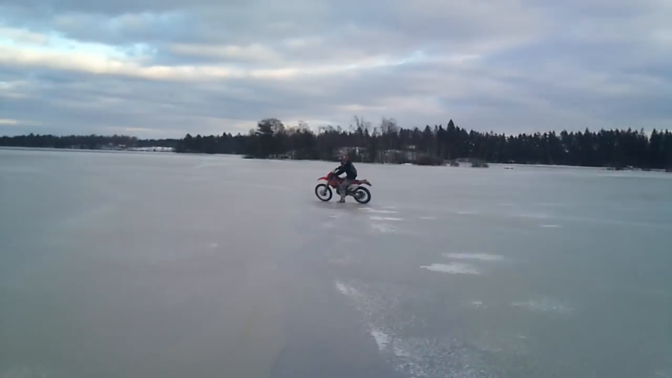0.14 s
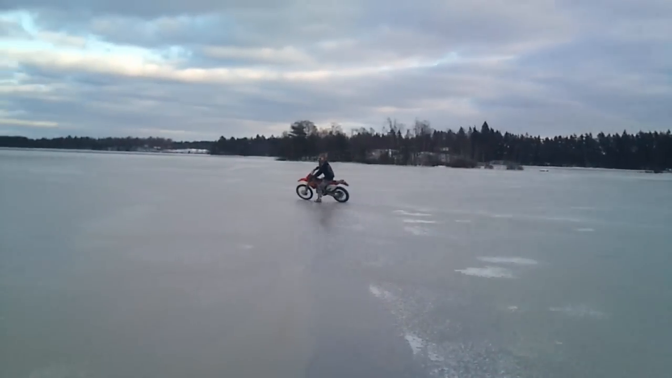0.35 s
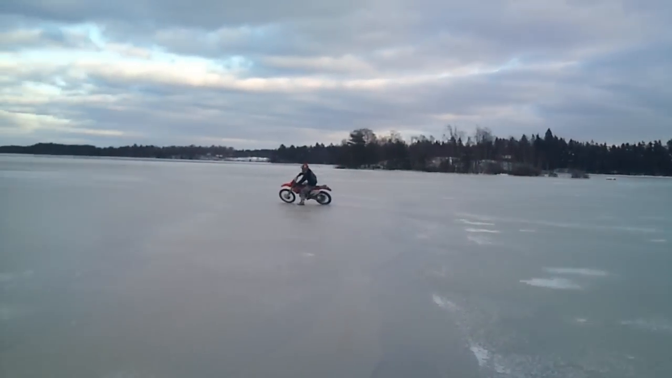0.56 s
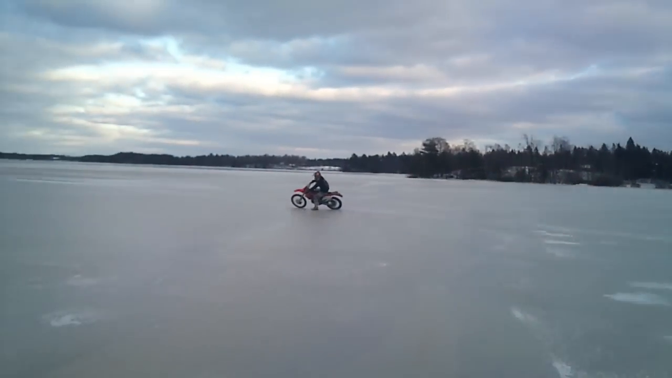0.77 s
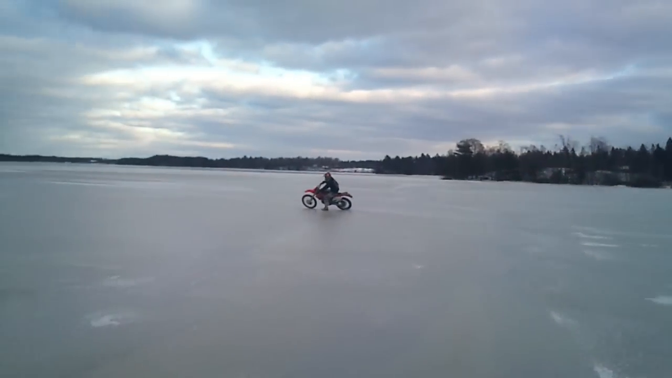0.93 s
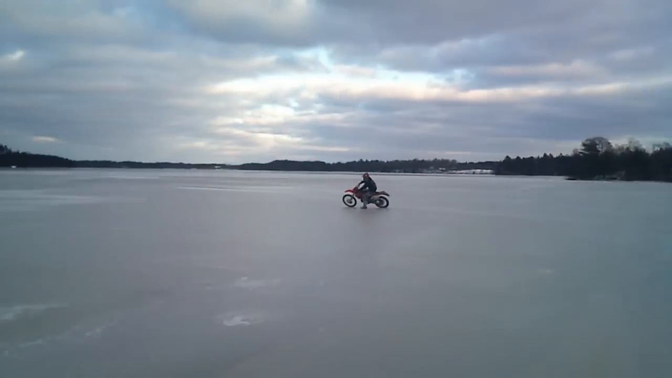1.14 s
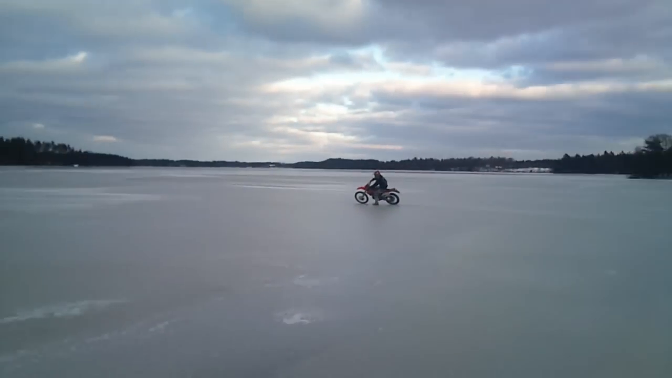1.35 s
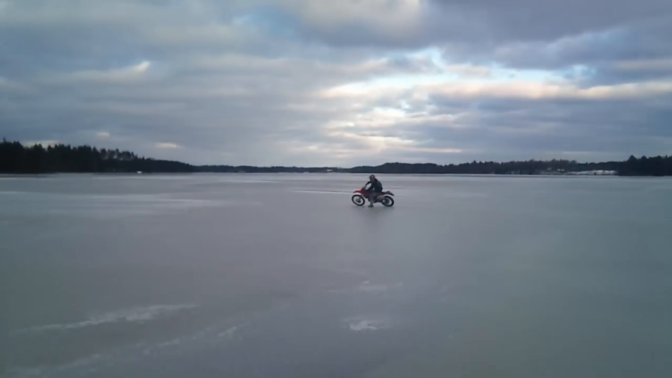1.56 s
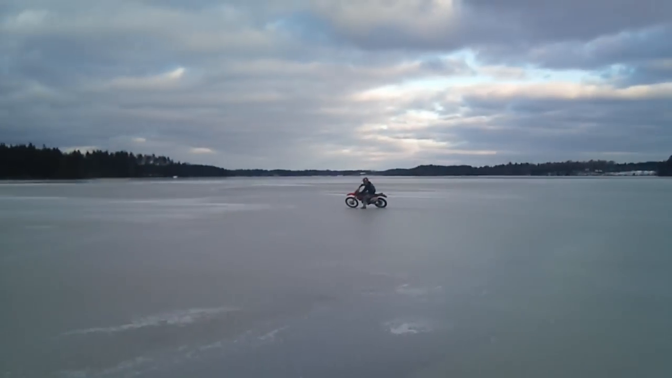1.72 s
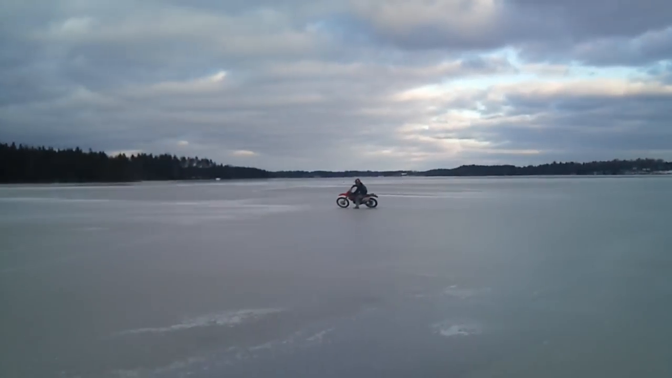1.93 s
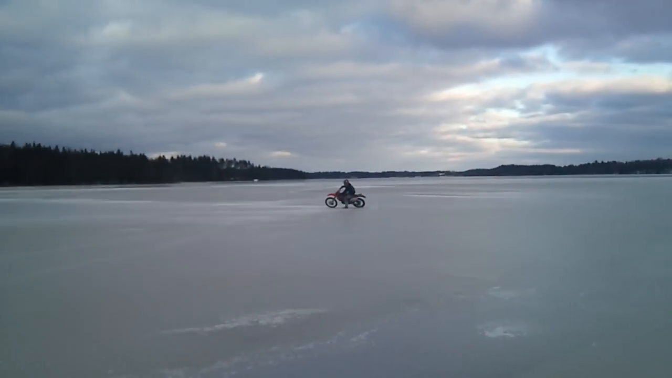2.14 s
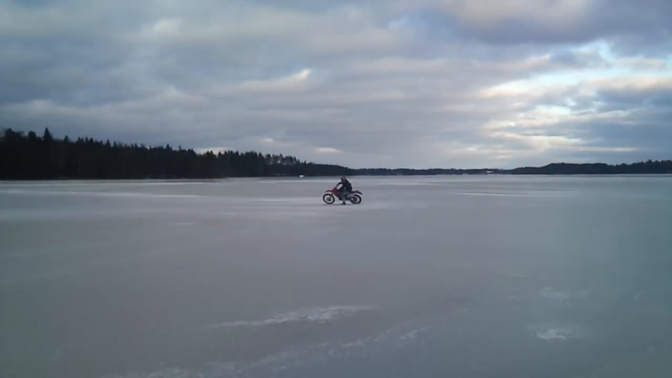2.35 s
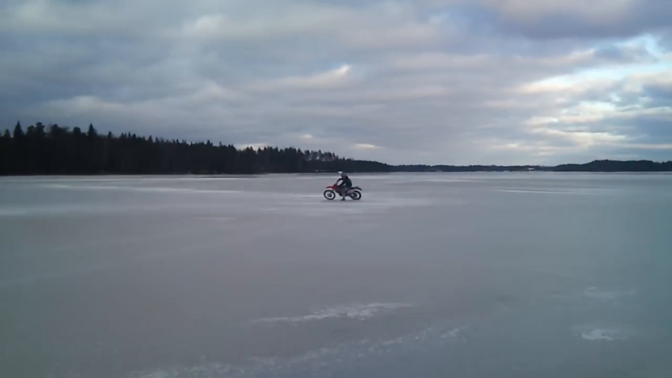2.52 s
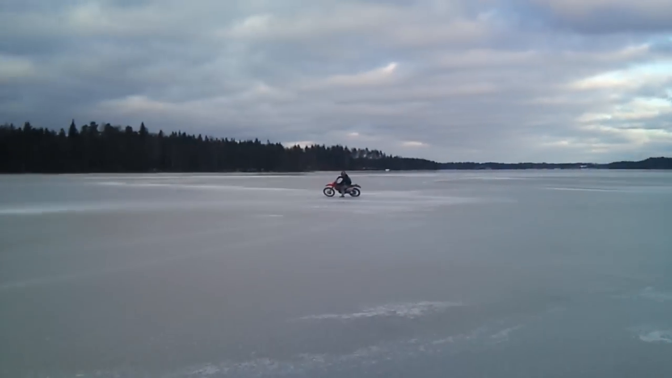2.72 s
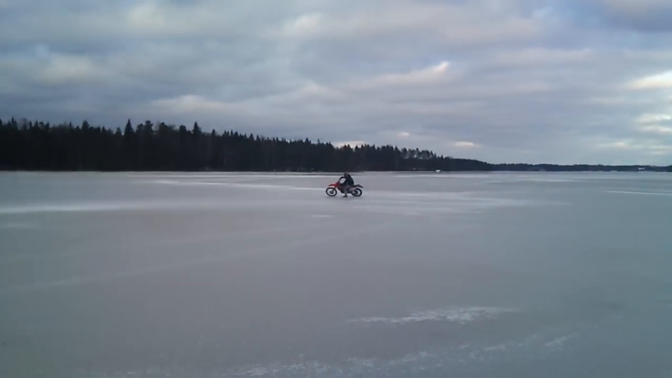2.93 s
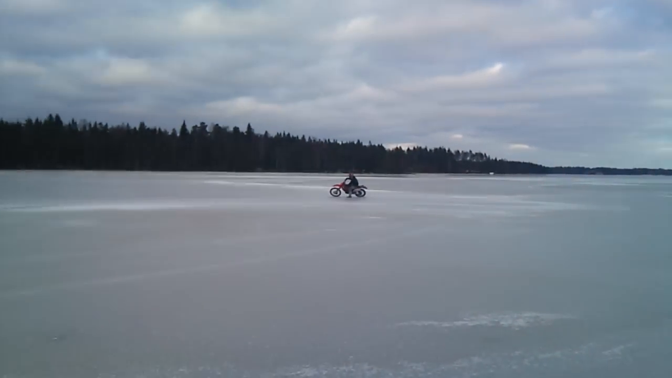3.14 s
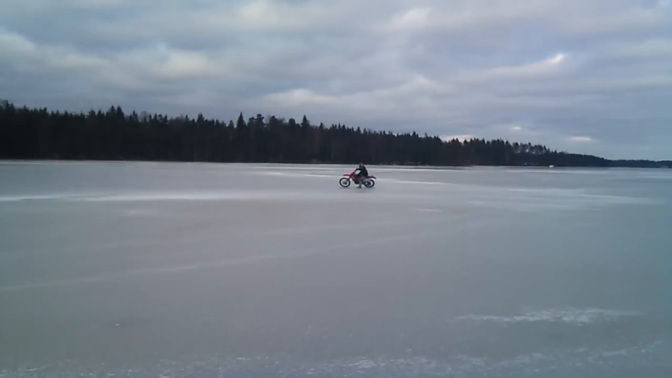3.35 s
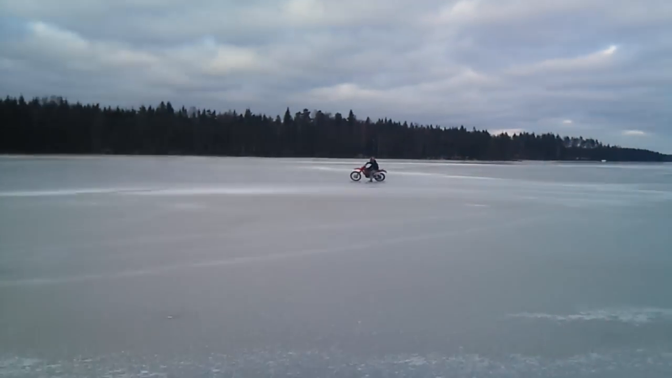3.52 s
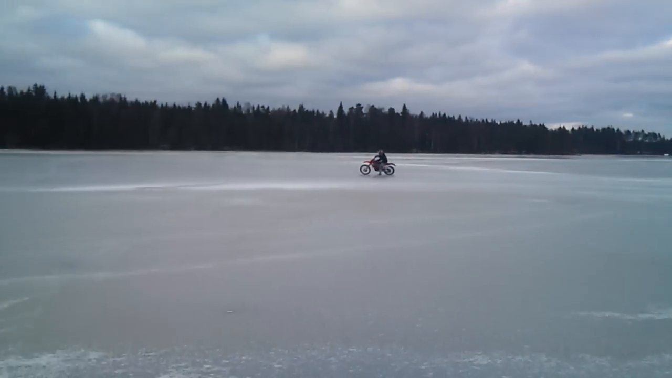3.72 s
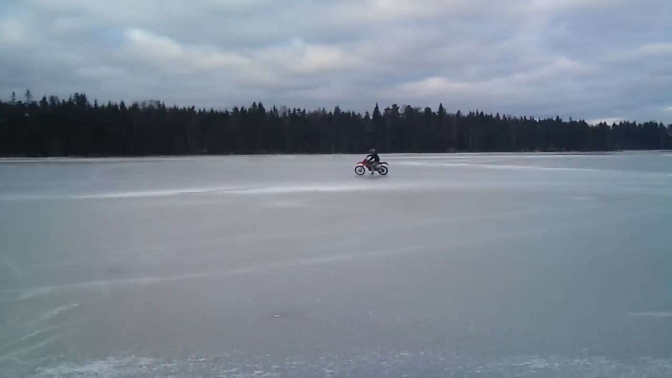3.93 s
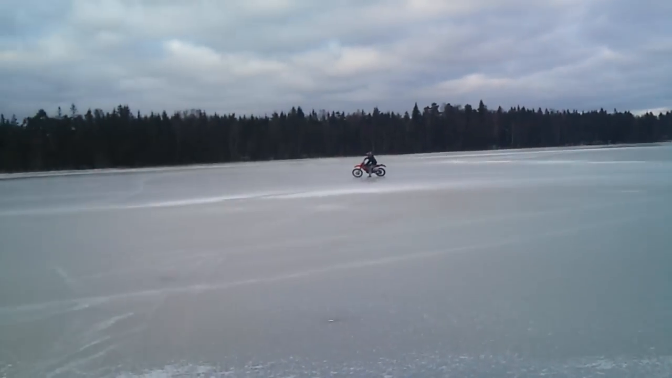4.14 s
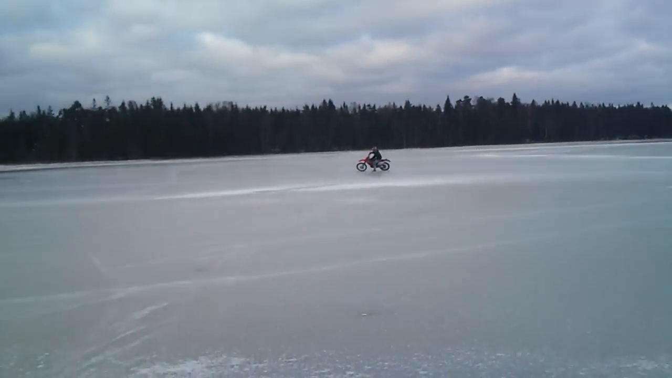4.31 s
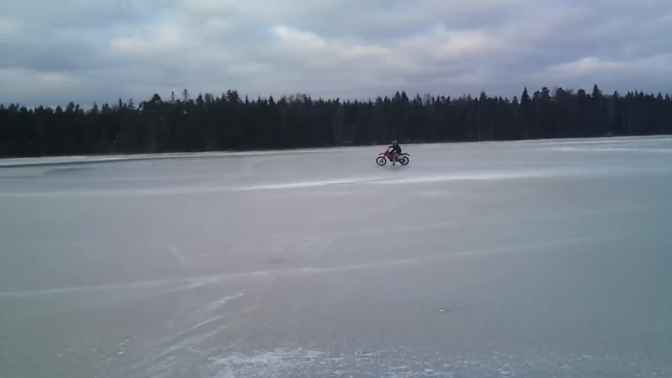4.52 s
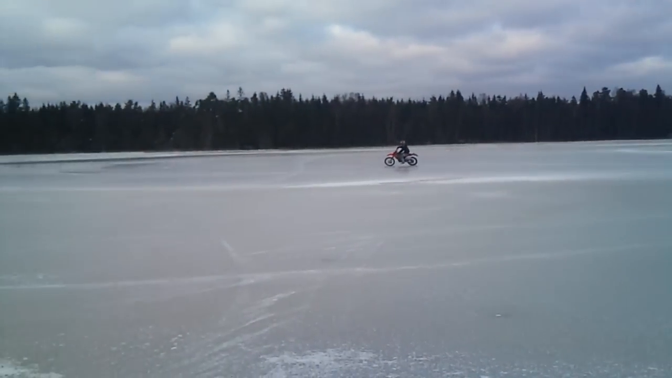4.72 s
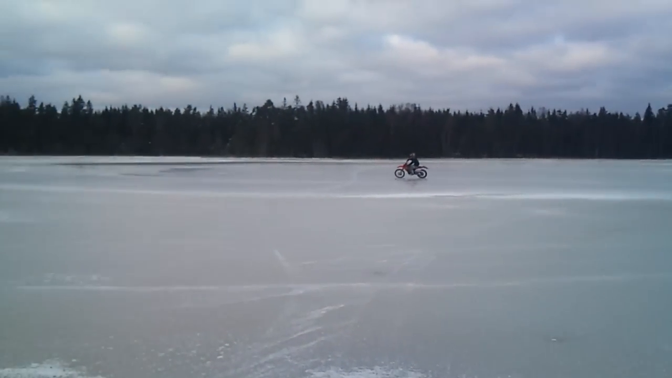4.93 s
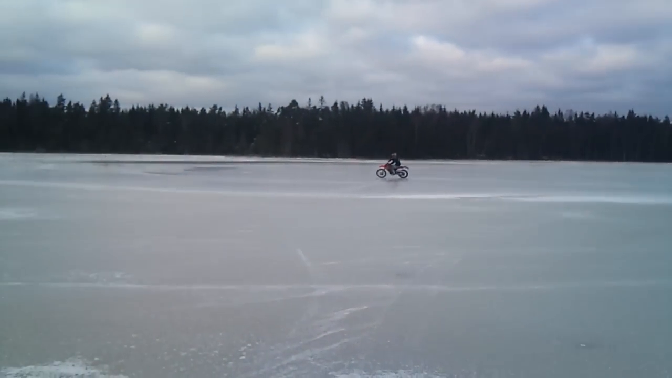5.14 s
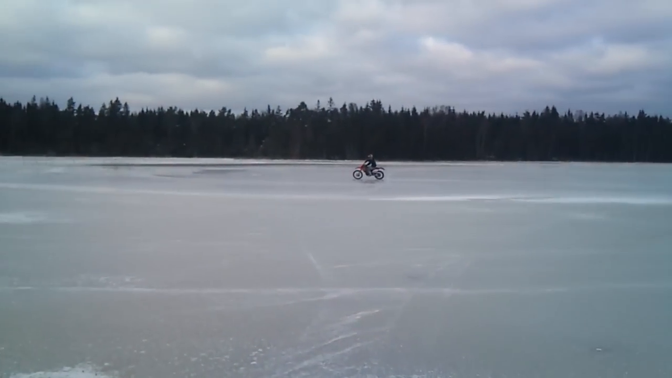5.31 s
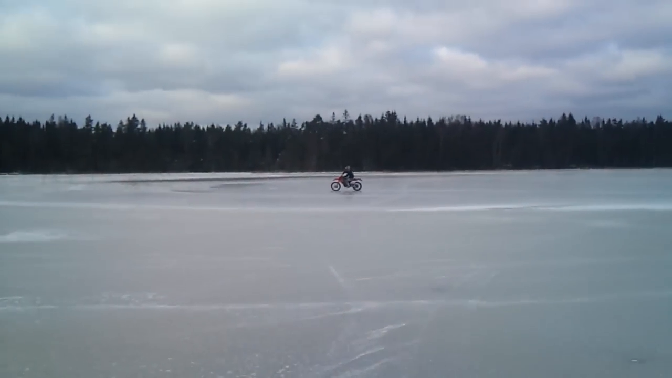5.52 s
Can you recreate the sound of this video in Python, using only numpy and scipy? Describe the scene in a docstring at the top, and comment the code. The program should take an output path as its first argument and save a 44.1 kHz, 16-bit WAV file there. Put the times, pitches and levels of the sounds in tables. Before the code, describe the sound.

Raspy four-stroke motorcycle exhaust, rapid even banging at nearly constant revs, grows duller and quieter with distance before the throttle finally closes.

```python
"""A frozen lake: a single-cylinder four-stroke dirt bike, already some way off, draws further away.
Each firing sends a pressure bang down the exhaust pipe, where it reflects; the silencer rings and booms,
the steep wave front cracks, the outlet sputters and the gas rushes. Near the end the throttle shuts:
low gulps and soft puffs replace the bangs. Faint scattered sound and a light wind lie behind."""
import sys
import numpy as np
from scipy import signal
from scipy.io import wavfile
from scipy.ndimage import uniform_filter1d

SR = 44100
rng = np.random.default_rng(int(sys.argv[2]) if len(sys.argv) > 2 else 0)


def generate_wav(signal):
    """Clip the signal to [-1, 1] and save it as 16-bit WAV at the path in sys.argv[1]."""
    frames = np.transpose(np.atleast_2d(signal))
    scaled = np.clip(frames, -1, 1) * 32767
    pcm = np.round(scaled).astype(np.int16)
    wavfile.write(sys.argv[1], SR, pcm)


N = 245637
TIME = np.arange(N) / SR

# engine speed under power: time_s, firing_rate_hz
FIRING_RATE = [(0.0, 42.55), (0.33, 43.17), (0.69, 46.84), (0.9, 46.44), (0.94, 45.43), (1.28, 45.5),
               (1.5, 44.95), (1.7, 45.45), (1.96, 47.43), (2.36, 46.6), (2.86, 47.21), (3.24, 48.59),
               (3.6, 46.69), (3.66, 47.09), (3.91, 43.44), (4.22, 47.77), (4.68, 46.74), (4.93, 48.19)]
# the rider's hand: time_s, opening (0 shut, 1 wide open)
THROTTLE_OPENING = [(0, 0.92), (.8, 0.8), (.94, 0.66), (1.9, 0.78), (3.05, 0.69), (3.4, 0.3), (3.85, .3),
                    (4.08, 1), (4.22, .7), (4.6, 0.69), (4.9, .7)]
# the bike's path: time_s, distance_m
BIKE_DISTANCE = [(0, 26.1), (3.6, 47.8), (5.57, 63.6)]
# reflections in header and silencer, before temperature and throttle act: delay_ms, pressure_share
PIPE_ECHOES = [(2.05, 0.33), (3.47, 0.44), (5.3, 0.69), (7.5, 0.23), (10.64, 0.2), (13.57, -0.073),
               (15.9, 0.14), (18.3, 0.064)]
# hot gas carries sound faster, so echoes come sooner as the pipe warms: time_s, delay_factor
PIPE_WARMING = [(0, 1.036), (1.4, .995), (4.9, 0.988)]
# standing waves of the silencer can: frequency_hz, width_hz, level_db (relative to the passing wave)
CAN_MODES = [(234.2, 18, -3.5), (387.5, 39, -1), (553.6, 56, -14), (807, 200, -5.5)]
# silencer's honk near 770 Hz: time_s, level_db (over its usual level)
HONK_LEVEL = [(0, 2), (.9, -2.5), (2, -3), (3.85, -2.5), (4.08, 6.5), (4.65, 0.5), (4.85, 5.5)]
# silencer's upper ring, before a fixed trim: time_s, level_db
UPPER_RING_LEVEL = [(0.06, -31), (0.81, -26.5), (0.96, -33), (2.06, -29.5), (2.33, -37), (3.38, -35.5),
                    (3.42, -41.5), (3.94, -31), (4.14, -37.5), (4.29, -32.5), (4.41, -40.5), (4.88, -37)]
# gas flow through one cycle, before the surge factor: cycle_share since the firing, level_db
GAS_FLOW = [(0, -12), (.05, 4.5), (.22, 0.5), (.38, 4.5), (.6, 0.5), (1, -1.5)]
# hiss of the gas, before its random waver: time_s, level_db
HISS_LEVEL = [(0, -25.5), (.43, -29.5), (1.7, -34), (2.2, -36), (2.8, -36.8), (2.93, -42), (3.12, -37),
              (5.05, -39), (5.57, -42)]
# filter shapes, relative levels: frequency_hz, level_db
BANG_SPECTRUM = [(30, -43), (55, -9.5), (95, -17.5), (135, -5), (185, 3), (290, -2), (400, -3), (570, 1.5),
                 (680, -1.5), (800, -11), (1100, -37), (1500, -36.5), (1900, -42), (4000, -56)]
CRACK_SPECTRUM = [(1200, -25.5), (1850, -29), (2030, -3), (2200, -8), (2400, 0), (2560, -3), (2930, 4),
                  (3400, -0.5), (4000, -4.5), (5000, -23), (7500, -35)]
PUFF_SPECTRUM = [(100, -19), (250, -22.5), (350, 14), (480, 5), (600, 8), (800, -0.5), (1100, -8.5),
                 (1450, -55), (1900, -52), (4000, -50)]
GAS_SPECTRUM = [(900, -28), (1500, -31), (1680, -11.5), (1860, -24.5), (2040, -12.5), (2250, -22),
                (2550, -13), (2910, -11), (3250, -11), (4000, -5.5), (4550, -7.5), (5200, -6), (6800, -7.5),
                (7700, -21.5)]
WIND_SPECTRUM = [(20, -23), (45, -8.5), (80, -1), (200, -22.5), (1000, -0.5), (3000, -42.5), (7500, -52.5)]

SHUT_S = 4.936  # the throttle shuts
FIRING_ANGLE = .75  # share of a cycle still to run at the start before a firing
CRUISE_HZ = 46  # firing rate at which the rev-dependent levels hold
# throttle shut: the firing rate drops at once, then sags steadily
DROP_HZ, DROP_S, SAG_HZ_PER_S = 6.476, .0165, 3.863
# the firing pattern jumps ahead once, at this time, by this share of a cycle
SKIP_S, SKIP_SHARE = 1.495, .087
# each layer: level at the start of the path and loss per doubling of distance
BANG_DB, BANG_LOSS_DB = -14, 8  # throttle wide open
CRACK_DB, CRACK_LOSS_DB = -25, 18  # throttle wide open, at CRUISE_HZ
BOOM_DB, BOOM_LOSS_DB = -29, 5.5  # throttle wide open
SPUTTER_DB, SPUTTER_LOSS_DB = -39, 5  # revs steady
# easing the throttle from open to shut softens each stroke and makes it more turbulent
BANG_EASE_DB, CRACK_EASE_DB, BOOM_EASE_DB, TURBULENCE_EASE_DB = -6, -6, -1.5, 7
# reflection strength with the throttle open, and how much of it easing off takes away
REFLECT, REFLECT_EASE = 1, 0.72
# turbulence relative to the bang at CRUISE_HZ; higher revs smooth the bang and steepen the crack
TURBULENCE_DB, TURBULENCE_DB_PER_HZ, CRACK_DB_PER_HZ = -19.5, -0.2, 1.5
# sputter rises by this for each firing per second gained or lost in a second
SPUTTER_CHANGE_DB = 0.39
# throttle shut: first levels and how fast they fade
GULP_DB, GULP_FADE_DB_PER_S, PUFF_DB, PUFF_FADE_DB_PER_S = -24.5, 7, -29, 1.3
COAST_RISE_S = .025
# throttle shut, the gas cools: final factor on the pipe's delays, and time constant
COOL_STRETCH, COOL_S = 1.17, 0.11
# factor on the dB swing of the gas flow, under power and with the throttle shut
SURGE_DRIVEN, SURGE_SHUT = 1.08, 1.6
MIC_EDGE_HZ, EDGE_HZ = 7480, 15800


def exhaust(times, ring_trim_db=-1):
    """Wave steepening: a bang with turbulence excites pipe and silencer, and its steep front cracks."""
    clicks = strokes(times, uneven_db=0.1, jitter_ms=0.047)
    ease, far, revs = eased(), doublings(), speed() - CRUISE_HZ
    reflect, stretch = REFLECT - REFLECT_EASE * ease, curve(PIPE_WARMING)

    turbulence_db = TURBULENCE_DB + TURBULENCE_EASE_DB * ease + TURBULENCE_DB_PER_HZ * revs
    turbulence = gain_of(turbulence_db) * burst(clicks, decay_ms=22)
    wave = pipe(clicks + turbulence, reflect, stretch)
    bang = steady(colour(honk(silencer(wave)), BANG_SPECTRUM), size=2900)
    bang *= gain_of(BANG_DB + BANG_EASE_DB * ease - BANG_LOSS_DB * far)

    upper_ring = steady(ring(ring(wave, hz=940, width_hz=140), hz=955, width_hz=170))
    upper_ring *= gain_of(curve(UPPER_RING_LEVEL) + ring_trim_db)

    fronts = delayed(clicks, ms=.5)
    rasp = 0.52 * burst(fronts, decay_ms=1.0) + .5 * burst(fronts, decay_ms=12)
    front_wave = pipe(fronts + rasp, 0.77 * reflect, stretch)
    crack = steady(colour(front_wave, CRACK_SPECTRUM), size=1450)
    crack *= gain_of(CRACK_DB + CRACK_EASE_DB * ease + CRACK_DB_PER_HZ * revs - CRACK_LOSS_DB * far)
    return bang + upper_ring + crack * waver(depth_db=1.02)


def boom(times):
    """Cavity resonance: each stroke sets the gas in the silencer's volume booming."""
    clicks = strokes(times, uneven_db=1.1, jitter_ms=0.024)
    swing = ring(ring(clicks, hz=109, width_hz=50), hz=115, width_hz=130)
    low = colour(swing, [(30, -25.5), (90, 0.5), (200, 3), (600, -1)])
    return steady(low) * gain_of(BOOM_DB + BOOM_EASE_DB * eased() - BOOM_LOSS_DB * doublings())


def overrun(times):
    """Flow reversal: the cylinder sucks gas back, then puffs it through a cooler, slower pipe."""
    clicks = strokes(times, uneven_db=1.0, jitter_ms=.03)
    since = coasted()

    suck = ring(delayed(clicks, ms=1.9), hz=142.3, width_hz=37)
    gulp = colour(suck, [(35, -4.5), (120, 2.0), (210, -1.5), (400, -3.5), (1500, -31)])
    gulp = steady(gulp) * gain_of(GULP_DB - GULP_FADE_DB_PER_S * since)

    late = delayed(clicks, ms=8.69)
    stretch = COOL_STRETCH + (1 - COOL_STRETCH) * np.exp(-since / COOL_S)
    blown = pipe(late + .3 * burst(late, decay_ms=12), strength=.7, stretch=stretch)
    puff = -colour(blown, PUFF_SPECTRUM)  # opposite polarity
    puff = steady(puff) * gain_of(PUFF_DB - PUFF_FADE_DB_PER_S * since)
    return (gulp + puff) * (1 - np.exp(-since / COAST_RISE_S))


def sputter(times):
    """Turbulent outflow: a papery flutter of noise at the outlet after each stroke."""
    puffs = burst(strokes(times, uneven_db=0.5, jitter_ms=0.093), decay_ms=24)
    spectrum = [(600, -15.0), (1050, -4.0), (1270, -3.0), (1490, -4.0), (1590, -20),
                (1900, -36.5), (4000, -46.0)]
    voiced = colour(puffs, spectrum)
    change = uniform_filter1d(abs(np.gradient(curve(FIRING_RATE), TIME)), size=8000)
    return steady(voiced) * gain_of(SPUTTER_DB + SPUTTER_CHANGE_DB * change - SPUTTER_LOSS_DB * doublings())


def rush(turns):
    """Modulated flow noise: the hiss of gas swells and fades within every cycle."""
    surge = np.where(TIME < SHUT_S, SURGE_DRIVEN, SURGE_SHUT)
    flow_db = np.interp(turns % 1, *np.transpose(GAS_FLOW)) * surge
    hiss = colour(rng.standard_normal(N) * gain_of(flow_db), GAS_SPECTRUM)
    return steady(hiss) * gain_of(curve(HISS_LEVEL)) * waver(depth_db=0.92)


def pipe(x, strength, stretch=1):
    """Reflection: the wave leaves the pipe once directly and again after each echo delay."""
    return x + strength * sum(share * delayed(x, ms * stretch) for ms, share in PIPE_ECHOES)


def silencer(x):
    """Standing waves: the can passes the wave and keeps ringing between the bangs."""
    modes = [gain_of(db) * 2 * np.pi * width / SR * ring(x, hz, width) for hz, width, db in CAN_MODES]
    return x + sum(modes)


def honk(x, hz=770, width_hz=110):
    """Selective resonance: lifts or lowers one narrow band of the exhaust note."""
    extra = gain_of(curve(HONK_LEVEL)) - 1
    return x + extra * 2 * np.pi * width_hz / SR * ring(x, hz, width_hz)


def strokes(times, uneven_db, jitter_ms):
    """Near-periodic impulses: one click a cycle, with random spread in strength and timing."""
    strength, slip = rng.standard_normal((len(times), 2)).T
    at = np.clip(np.round((times + slip * jitter_ms / 1000) * SR).astype(int), 0, N - 1)
    return np.bincount(at, gain_of(uneven_db * strength), N)


def burst(clicks, decay_ms):
    """Exponential decay: a dying puff of noise, of unit mean energy for a unit click."""
    keep = np.exp(-1000 / (decay_ms * SR))
    envelope = signal.lfilter([np.sqrt(1 - keep ** 2)], [1, -keep], clicks)
    return envelope * rng.standard_normal(N)


def speed():
    """Engine braking: firings per second, held by the rider and then falling."""
    drop = DROP_HZ * (1 - np.exp(-coasted() / DROP_S))
    return curve(FIRING_RATE) - drop - SAG_HZ_PER_S * coasted()


def coasted():
    """Elapsed time: seconds since the throttle shut; zero before."""
    return np.maximum(TIME - SHUT_S, 0)


def eased():
    """Throttling: how far the opening is backed off, 0 wide open, 1 shut."""
    return 1 - np.clip(curve(THROTTLE_OPENING), 0, 1)


def doublings():
    """Distance law: how many times the distance has doubled since the start."""
    metres = curve(BIKE_DISTANCE)
    return np.log2(metres / metres[0])


def waver(depth_db, count=24):
    """Superposed slow sines with random phases: a gain drifting a few times a second."""
    hz, t = np.geomspace(2, 14, count), TIME[::200]
    phases = np.outer(t, hz) + rng.random(count)
    drift = (np.sin(2 * np.pi * phases) / np.sqrt(hz)).sum(1)
    return gain_of(depth_db * np.interp(TIME, t, drift / drift.std()))


def ring(x, hz, width_hz):
    """Damped resonance: one complex pole, whose bandwidth sets the decay."""
    pole = np.exp((2j * np.pi * hz - np.pi * width_hz) / SR)
    return signal.lfilter([1], [1, -pole], x).real


def delayed(x, ms):
    """Propagation delay: x arrives later by ms."""
    return np.interp(TIME - ms / 1000, TIME, x, left=0)


def colour(x, points, size=8192):
    """Minimum-phase filtering: a causal filter with the given spectrum."""
    hz, db = np.transpose(points)
    grid = np.fft.rfftfreq(size, 1 / SR) + 1
    log_gain = np.log(gain_of(np.interp(np.log(grid), np.log(hz), db)))
    circle = np.r_[log_gain, log_gain[-2:0:-1]]
    # the Hilbert transform of the log gain gives the matching phase
    taps = np.fft.ifft(np.exp(np.conj(signal.hilbert(circle)))).real
    return signal.oaconvolve(x, taps[:size // 2])[:N]


def steady(x, size=4200):
    """Level normalisation: divides x by its running rms, with a floor for near-silence."""
    power = uniform_filter1d(uniform_filter1d(x ** 2, size), size)
    return x / np.sqrt(abs(power) + np.mean(x ** 2) / 100)


def curve(rows):
    """Linear interpolation: a table's second column joined by straight lines in time."""
    rows = np.asarray(rows)
    return np.interp(TIME, rows[:, 0], rows[:, 1])


def gain_of(db):
    """Logarithmic level: decibels to amplitude."""
    return 10 ** (np.asarray(db) / 20)


def lake(x, t60=1.0, wet_db=-25):
    """Scattering: faint, exponentially decaying noise-like echoes from the ice and the shore."""
    t = TIME[:SR]
    tail = rng.standard_normal(SR) * gain_of(-60 * t / t60) * (t > .02)
    return x + gain_of(wet_db) * signal.oaconvolve(x, tail / np.linalg.norm(tail))[:N]


def air(level_db=-48):
    """Flow noise: light wind rumbling at the microphone, as filtered noise."""
    wind = colour(rng.standard_normal(N), WIND_SPECTRUM)
    return gain_of(level_db) * wind / wind.std()


def scene():
    """Superposition: one firing a cycle drives every engine layer, and the lake and wind are added."""
    turns = np.cumsum(speed()) / SR - FIRING_ANGLE + SKIP_SHARE * (TIME > SKIP_S)
    # whole turns are firings
    times = np.interp(np.arange(-1, int(turns[-1]) + 1), turns, TIME)
    driven, coasting = times[times < SHUT_S], times[times >= SHUT_S]
    bike = exhaust(driven) + boom(driven) + overrun(coasting) + sputter(times) + rush(turns)
    return (lake(bike) + air())[None]


def record(dry, ceiling=0.702):
    """Band limiting and clipping: a narrow microphone channel clips peaks, then a wider low-pass."""
    mic_taps = signal.firwin(201, MIC_EDGE_HZ, window=("kaiser", 7), fs=SR)
    narrow = signal.oaconvolve(dry, mic_taps[None], "same")
    clipped = np.clip(narrow, -ceiling, ceiling)
    edge_taps = signal.firwin(511, EDGE_HZ, window=("kaiser", 9), fs=SR)
    return signal.oaconvolve(clipped, edge_taps[None], "same")


dry = scene()
out = record(dry)
generate_wav(out)
```